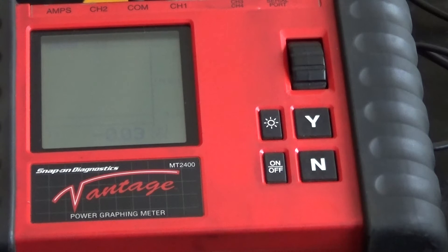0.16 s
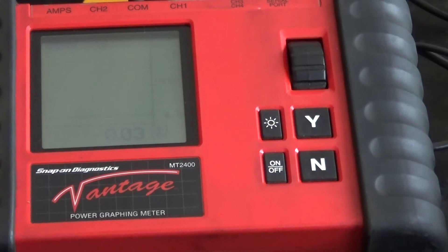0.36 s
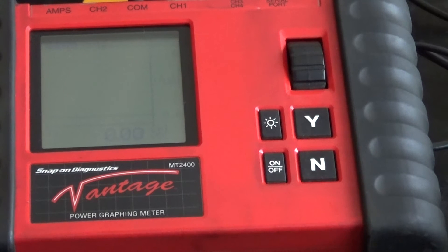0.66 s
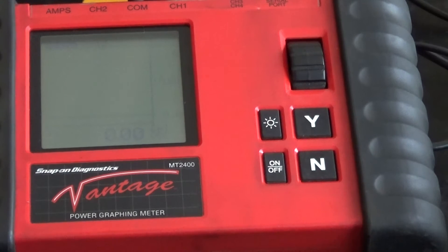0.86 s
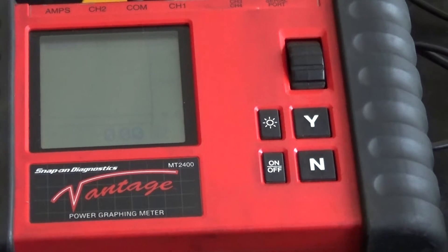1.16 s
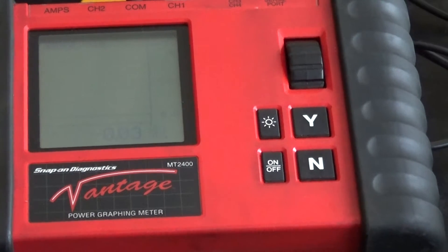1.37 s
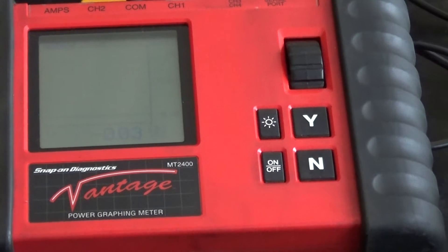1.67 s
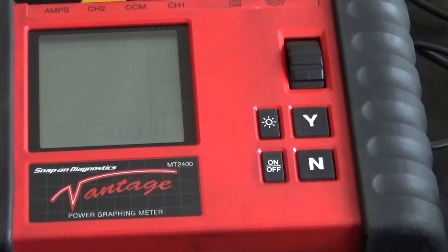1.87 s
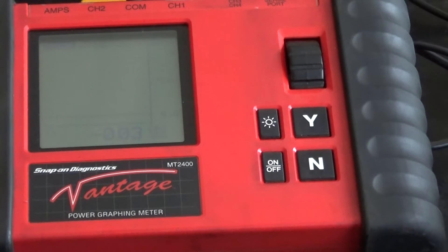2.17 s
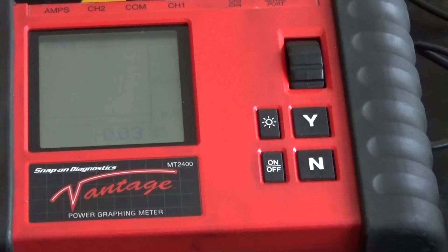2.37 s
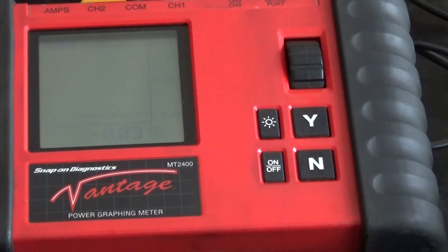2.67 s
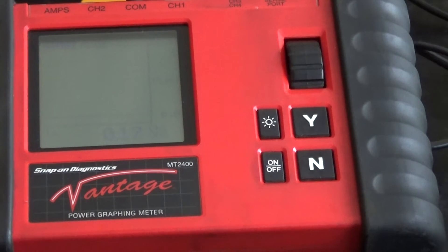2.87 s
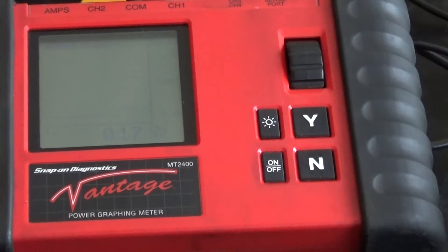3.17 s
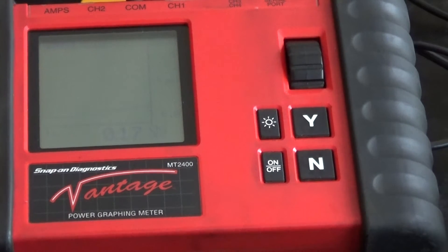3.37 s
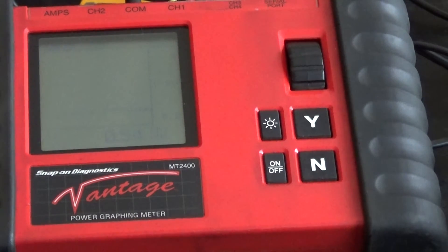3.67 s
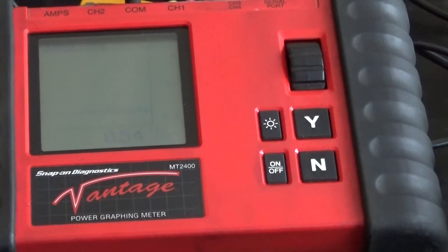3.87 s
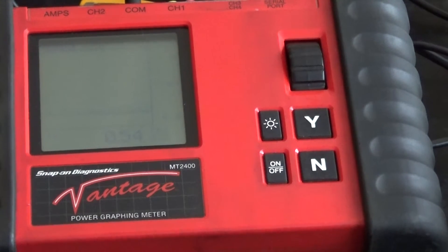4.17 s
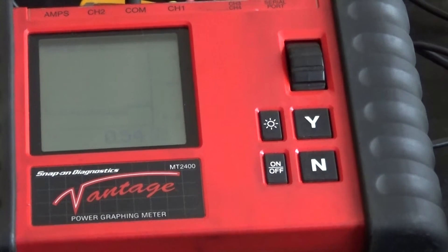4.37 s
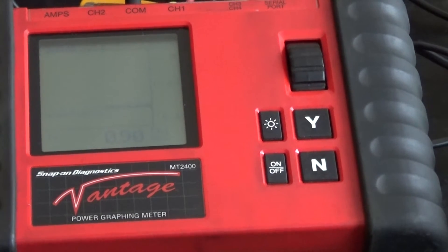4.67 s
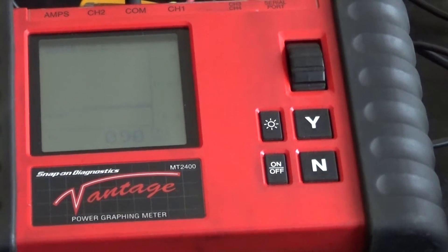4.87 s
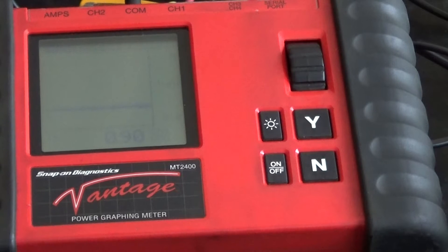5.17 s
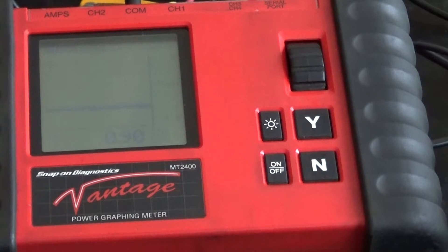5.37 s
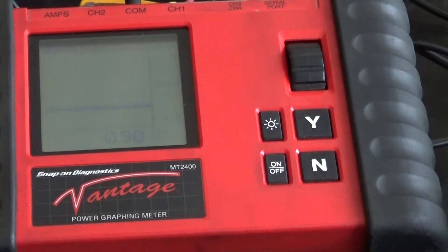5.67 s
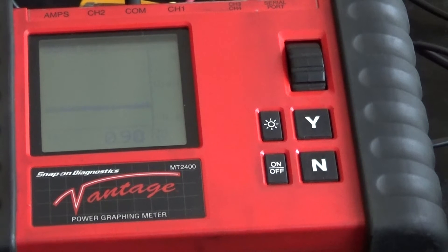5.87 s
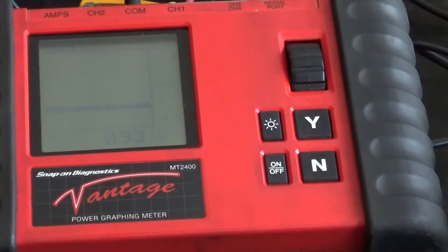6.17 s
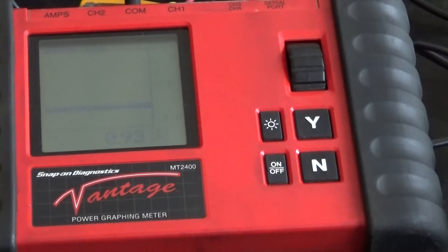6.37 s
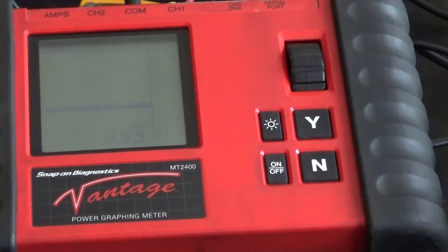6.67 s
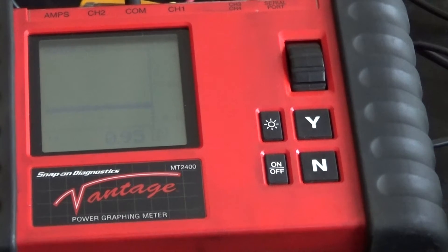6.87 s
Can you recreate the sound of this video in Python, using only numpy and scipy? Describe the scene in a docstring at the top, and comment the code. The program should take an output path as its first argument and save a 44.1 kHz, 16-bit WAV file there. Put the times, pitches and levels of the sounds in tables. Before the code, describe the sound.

In a quiet garage, small clicks and shuffling precede a short growling starter, then a petrol engine barks, revs up and idles steadily with valve clatter.

```python
"""Clicks and shuffling, a grinding starter, then a throbbing engine with ticking valves and a faint whine.
A four-cylinder petrol car is started in a garage, with two microphones close to the engine bay.
Engine pulses follow one crank cycle and excite air and metal resonances; the alternator is a gliding tone.
The starter is worn-tooth noise, strokes and howl that follow its motor; key and body noises are shaped
noise bursts and decaying tones, over a steady room murmur and hiss."""
import sys
import numpy as np
from scipy import signal
from scipy.fft import rfft, irfft
from scipy.io import wavfile

SR = 44100
rng = np.random.default_rng(int(sys.argv[2]) if len(sys.argv) > 2 else 0)


def int16_out(signal):
    """Quantize to a 16-bit WAV file."""
    q = np.round(np.clip(np.atleast_2d(signal).T, -1, 1) * 32767)
    wavfile.write(sys.argv[1], SR, q.astype(np.int16))


N = 309582
T = np.arange(N) / SR


def undb(db):
    """Decibels to gain."""
    return 10 ** (np.asarray(db) / 20)


def unit(x):
    """Scale to rms 1."""
    return x / np.sqrt(np.mean(x ** 2))


def ramp(start, end):
    """Rises from 0 to 1 between two times in seconds."""
    return np.clip((T - start) / max(end - start, 1e-3), 0, 1)


def swell(s, half_length):
    """A smooth Gaussian bump of height 1; half_length is its standard deviation in seconds."""
    return np.exp(-((T - s) / half_length) ** 2 / 2)


def noise():
    """White noise."""
    return rng.standard_normal(N)


def walk(rate):
    """A random wander through straight lines between knots, `rate` knots per second."""
    knots = rng.standard_normal(4096)
    return 1.08 * np.interp(T * rate, np.arange(len(knots)), knots)


def convolve(x, response):
    """Pass a sound through an impulse response."""
    return signal.oaconvolve(x, response)[:N]


def colour(x, points, size=8192):
    """Causal minimum-phase filter through (hz, db) points."""
    hz, db = np.transpose(points)
    bins_hz = np.arange(size // 2 + 1) * SR / size
    log_gain = np.log(undb(np.interp(np.log(bins_hz + 1), np.log(hz), db)))
    # folding the cepstrum forward in time makes the filter causal
    cepstrum = irfft(log_gain)
    cepstrum[1:size // 2] *= 2
    cepstrum[size // 2 + 1:] = 0
    return convolve(x, irfft(np.exp(rfft(cepstrum))))


def resonate(x, hz, width):
    """One resonance with gain 1 at its centre."""
    return signal.lfilter(*signal.iirpeak(hz, hz / width, fs=SR), x)


def resonate_twice(x, hz, width):
    """The same resonance passed twice, for steeper sides."""
    return resonate(resonate(x, hz, width), hz, width)


def band(hz, width):
    """Noise of rms 1 in one steep resonance."""
    return unit(resonate_twice(noise(), hz, width))


def tail(t60, size=32768):
    """Dense decaying echoes of unit energy; t60 in seconds."""
    response = rng.standard_normal(size) * undb(-60 * np.arange(size) / SR / t60)
    return response / np.linalg.norm(response)


def pulses(times, sizes):
    """Impulses at the given times in seconds."""
    samples = np.clip(np.round(np.asarray(times) * SR).astype(int), 0, N)
    return np.bincount(samples, sizes, N + 1)[:N]


def each_cycle(cycle, place, db, scatter_db, jitter_s, count=128):
    """One impulse whenever the engine passes a place in its cycle."""
    chance = rng.standard_normal((count, 2))
    times = np.interp(np.arange(count) + place, cycle, T, right=2 * T[-1])
    return pulses(times + jitter_s * chance[:, 0], undb(db + scatter_db * chance[:, 1]))


# air box resonances: centre_hz, width_hz, level_db
AIRBOX = [(326, 52, -5), (379, 47, -8), (416, 62, 3.5), (494, 30, -13), (585, 20, -15), (712, 50, -19)]


def airbox(x):
    """The intake booms in a few broad resonances that swell and die within a firing or two."""
    return sum(undb(db) * resonate_twice(x, hz, width) for hz, width, db in AIRBOX)


# intake gulps of one cycle: place (0-1 of a cycle), level_db
GULPS = [(.165, -6.5), (.299, -10), (.532, -6.5), (.666, -.5), (.792, -5.5), (.903, -8), (.948, -7.5)]
# the idle valve opens once and pulls the engine up to speed
SURGE_START_S, SURGE_ATTACK_S, SURGE_HOLD_S, SURGE_RELEASE_S = 4.33, 0.1, 0.22, 0.2
SURGE_OPEN_S = SURGE_START_S + SURGE_ATTACK_S
SURGE_CLOSES_S = SURGE_OPEN_S + SURGE_HOLD_S
SURGE_END_S = SURGE_CLOSES_S + SURGE_RELEASE_S
# after the surge the intake falls back, then fills again as the firings settle
SETTLED_S, FALLBACK_DB = 5.68, -2
# while the idle valve is open, the firings drone in the inlet pipe
DRONE_HZ, DRONE_WIDTH_HZ, DRONE_DB = 309, 27, -12.5


def intake(cycle, intake_db, surge):
    """Unequal gulps throb once a cycle; until they settle, even firings and pipe rebounds mix in."""
    gulps = sum(each_cycle(cycle, place, db, scatter_db=1, jitter_s=.00003) for place, db in GULPS)
    unsettled = (1 - ramp(SURGE_END_S, SETTLED_S)) * (1 - .65 * surge)
    even = sum(each_cycle(cycle, 0.166 + k / 4, -7, scatter_db=2.5, jitter_s=.00008) for k in range(4))
    # the inlet pipe rings back between the firings
    rebounds = sum(each_cycle(cycle, .299 + k / 4, -11, scatter_db=2.5, jitter_s=.0003) for k in range(4))
    boom = unit(airbox(gulps * (1 - .6 * unsettled) + (even + rebounds) * unsettled))
    rush = unit(colour(noise(), [(40, -49), (140, -33), (250, -13), (400, 1.5), (500, -12.5),
                                 (800, -29), (2000, -50.0)]))
    rush = undb(-12.5 + 2 * unsettled) * rush
    drone = undb(DRONE_DB) * surge * unit(resonate_twice(even, DRONE_HZ, DRONE_WIDTH_HZ))
    fallback_db = FALLBACK_DB * unsettled * ramp(SURGE_CLOSES_S, SURGE_END_S)
    return (boom + drone + rush) * undb(intake_db + fallback_db) * ramp(3.58, 3.72)


# hardest of the first ragged firings: start_s, level_db
CATCHES = [(3.482, -26), (3.589, -25), (3.623, -13), (3.655, -17), (3.74, -13.5), (3.789, -17), (3.86, -33),
           (3.983, -12), (4.085, -22), (4.284, -22), (4.379, -11.5), (4.404, -10)]
# weaker firings between them follow the crank
RAGGED_START_S, RAGGED_END_S, RAGGED_DB, RAGGED_SCATTER_DB = 3.6, 4.4, -25, 4.5


def catches(cycle):
    """The first ragged firings: each barks in the air box and thumps in the exhaust."""
    times, db = np.transpose(CATCHES)
    weak = sum(each_cycle(cycle, k / 4, RAGGED_DB, RAGGED_SCATTER_DB, jitter_s=0.00185) for k in range(4))
    weak = weak * (T > RAGGED_START_S) * (T < RAGGED_END_S)
    bark_peak = np.abs(airbox(pulses([0], [1.]))).max()
    bark = airbox(pulses(times, undb(db)) + weak) / bark_peak
    # the thumps differ far less in strength than the barks
    blows = pulses(times, undb(0.16 * db)) + undb(1.0) * weak
    thump = resonate(resonate(blows, 110, 48), 78, 46)
    thump = signal.sosfilt(signal.butter(5, (48, 116), "bandpass", fs=SR, output="sos"), thump)
    return undb(-4.5) * bark + undb(16.0) * thump


# exhaust boom: multiple (of the firing rate), level_db
BOOM = [(1, -1), (2, -2.5), (3, -14.5), (4, -1)]


def exhaust(cycle, boom_db):
    """Smooth firing harmonics; all but the second come up as the speed rises."""
    risen = .2 + .8 * ramp(4.43, 5.0)
    boom = 0
    for multiple, db in BOOM:
        tone = undb(db) * np.sin(2 * np.pi * 4 * multiple * cycle)
        boom = boom + tone * (1 if multiple == 2 else risen)
    return undb(boom_db + .8 * walk(14)) * boom * ramp(3.57, 3.65)


# valve ticks of one cycle: place (0-1 of a cycle), level_db
TICKS = [(.153, 0), (.175, -4), (.225, 1), (.285, -3), (.395, -6), (.49, -1), (.517, -2), (.545, -3),
         (.62, -6), (.92, -2), (.975, -4)]
# chain and belt noise over one cycle: place (0-1 of a cycle), level_db
CHAIN = [(.06, -.5), (.2, -1.5), (.39, 0), (.58, .5), (.72, -3.5), (.82, -3.5), (.91, -1)]
# spectrum of the valve gear: frequency_hz, level_db
VALVE_COLOUR = [(30, -56), (150, -32), (310, -19), (520, -7), (635, -4), (775, -2), (845, -8.5),
                (1020, -0.5), (1110, -4), (1310, -3.5), (3520, -5), (3830, -4.5), (5320, -6.5),
                (6050, -5.5), (7490, -10), (9540, -8.5), (11500, -22.5), (13000, -28), (15700, -45)]
# valve cover, ringing at every tick: centre_hz, width_hz, level_db
COVER = [(990, 35, -4), (1330, 50, -3), (1960, 60, -3), (2850, 70, 0), (3350, 40, -4), (3880, 170, -1),
         (5900, 150, -6)]
COVER_DB = -9.5


def valve_gear(cycle, gear_db):
    """Valves tick with a metallic ring and a dry crack, over chain and belt noise that swells with cam load."""
    blows = [each_cycle(cycle, place, db, scatter_db=3, jitter_s=.00012) for place, db in TICKS]
    ring = sum(convolve(blow, tail(t60=.025)) for blow in blows)
    crack = noise() * convolve(sum(blows), undb(-60 * T[:2048] / .022))
    ticks = unit(colour(unit(ring) + unit(crack), [(500, -21), (1500, -17.5), (3000, -4.0),
                                                   (10000, -12.5), (14000, 8.5)]))
    place, db = np.transpose(CHAIN)
    load = undb(np.interp(cycle, place, db, period=1))
    rattle = unit(load * noise() * undb(0.37 * walk(500)))
    link_knocks = unit(load * links(cycle))
    clatter = unit(colour(.88 * ticks + .68 * rattle + .8 * undb(-2) * link_knocks, VALVE_COLOUR))
    cover = unit(sum(undb(db) * resonate(ring + crack, hz, width) / np.sqrt(width)
                     for hz, width, db in COVER))
    return unit(clatter + undb(COVER_DB) * cover) * undb(gear_db) * np.sqrt(ramp(3.58, 3.78))


def links(cycle, count=72):
    """Chain links and followers knock, small and dry, at the same places in every cycle."""
    chance = rng.standard_normal((count, 2))
    knocks = [each_cycle(cycle, (k + .3 * shift) / count, 3 * size, scatter_db=1.5, jitter_s=.00002)
              for k, (shift, size) in enumerate(chance)]
    # twelve different short rings are shared among the knocks
    return sum(convolve(sum(knocks[k::12]), tail(.006, size=512)) for k in range(12))


# nearest injector opening and shutting: place (0-1 of a cycle), level_db
INJECTOR = [(.168, -2), (.466, 0), (.49, -2)]
INJECTOR_DB = -38.5


def injector(cycle):
    """The nearest injector opens and shuts with thin, bright ticks at fixed places in the cycle."""
    blows = sum(each_cycle(cycle, place, db, scatter_db=2, jitter_s=.0001) for place, db in INJECTOR)
    tick = noise() * convolve(blows, undb(-60 * T[:2048] / .026))
    tick = unit(colour(tick, [(2000, -31), (6000, -26), (9500, 17), (11500, -16), (15500, -7)]))
    return undb(INJECTOR_DB) * tick * ramp(3.4, 7.7)


LIFTER_DB, LIFTER_START_S, LIFTER_OILED_S = -1, 4.0, 5.9


def dry_lifter(cycle):
    """One dry lifter clacks once a cycle, fading as oil pressure reaches it."""
    blows = each_cycle(cycle, .635, 0, scatter_db=1, jitter_s=.0001)
    clack = noise() * convolve(blows, undb(-60 * T[:4096] / .075))
    clack = resonate_twice(clack, 4300, 1300)
    return undb(LIFTER_DB) * clack * (T > LIFTER_START_S) * (1 - ramp(LIFTER_START_S, LIFTER_OILED_S))


WHINE_PER_CYCLE = 56.4  # cycles of the whine per engine cycle
BRACKET_HZ, BRACKET_WIDTH_HZ, BRACKET_DB = 586, 34, 21


def alternator(cycle, firing_hz, whine_db):
    """The belt-driven rotor whines well above the firing rate, louder where its bracket resonates."""
    hz = WHINE_PER_CYCLE * firing_hz / 4
    bracket_db = BRACKET_DB / (1 + (2 * (hz - BRACKET_HZ) / BRACKET_WIDTH_HZ) ** 2)
    tone = np.sin(2 * np.pi * WHINE_PER_CYCLE * cycle + .7 * walk(28))
    return tone * undb(whine_db + bracket_db + 3 * walk(9)) * ramp(3.6, 3.8)


# loose metal knocks: start_s, centre_hz, width_hz, level_db
KNOCKS = [(3.548, 2920, 1790, -16.5), (3.622, 2720, 700, -20), (3.642, 6450, 500, -20),
          (3.742, 1410, 1200, -20), (4.032, 1695, 1300, -20.5)]
KNOCK_T60_S = 0.14


def knocks():
    """Loose metal knocks, each in its own register, while the engine shakes."""
    out = 0
    for s, hz, width, db in KNOCKS:
        decay_db = -60 * np.maximum(T - s, 0) / KNOCK_T60_S
        out = out + band(hz, width) * undb(db + decay_db) * ramp(s, s + 0.0023)
    return out


SUCK_S, SUCK_HALF_LENGTH_S, SUCK_DB = 4.46, 0.12, -29


def suck():
    """A hollow rush of air is sucked past the idle valve as it opens."""
    air = unit(colour(noise(), [(300, -27), (580, 3), (820, -6), (1050, 6), (1500, -15), (3000, -46)]))
    return undb(SUCK_DB) * swell(SUCK_S, SUCK_HALF_LENGTH_S) * air


# compressions that load the starter: centre_s, half_length_s, growl_db
COMPRESSIONS = [(3.065, 0.041, -21), (3.207, 0.033, -24.5), (3.321, 0.019, -25), (3.432, 0.024, -24.5),
                (3.505, 0.013, -35)]
# pinion slamming in, then spun up as the engine catches: centre_s, half_length_s, added_db
GEAR_FLARES = [(2.94, 0.017, 5), (3.832, 0.076, 2)]
# tooth rate, sagging in compressions and racing once the engine fires: time_s, tooth_rate_hz
MESH = [(2.95, 900), (3.0, 1650), (3.05, 1330), (3.085, 1060), (3.12, 1300), (3.155, 1720), (3.18, 1600),
        (3.21, 1320), (3.245, 1400), (3.285, 1930), (3.33, 1530), (3.39, 1900), (3.435, 1560), (3.5, 2000),
        (3.8, 2100)]
# ring gear and bell housing resonances: centre_hz, width_hz, level_db
HOUSING = [(1310, 60, -5), (1645, 90, -3), (2285, 70, 2.5), (2660, 110, -4), (4268, 60, 5), (5240, 60, -1),
           (6600, 150, -6), (7190, 150, -6)]
# spectra of the grind, the growl and the coasting motor: frequency_hz, level_db
STARTER_COLOUR = [(30, -58), (150, -44), (1000, -16), (1700, 1.5), (2400, 0.5), (3300, 1), (4300, 4),
                  (5800, 3), (7300, 0.5), (8200, -2), (9500, -2), (12000, -13), (15700, -25)]
GROWL_COLOUR = [(30, -48), (130, -52), (230, -23.5), (400, -12), (560, -5), (720, 3), (850, -7), (1050, 0),
                (1350, -2.5), (2000, -11.5), (2600, -29), (4400, -69)]
COAST_COLOUR = [(3000, -14), (4200, -15), (4750, -3.5), (5300, -11), (6200, -15), (9200, -18.5),
                (10200, -15.5), (11500, -23), (15000, -35)]
PINION_TEETH, STROKES_PER_TURN, STROKE_SCATTER_DB, STROKE_T60_S = 10, 4, 4, .012
# the teeth bite a little ahead of each compression
STARTER_DB, BITE_DB, BITE_LEAD_S, FREE_GROWL_DB = -18, -0.7, 0.0083, -32
# overtone regions that flare: spacing, width, spread and knots per second
FLARE_STEP_HZ, FLARE_WIDTH_HZ, FLARE_SPREAD_DB, FLARE_RATE = 200, 140, 4.5, 30
# the housing rings in fits and stops as the pinion is thrown out
RING_SPREAD_DB, RING_RATE, THROWN_OUT_S = 2, 35, 3.87
GROAN_S, GROAN_HALF_LENGTH_S, GROAN_DB = 3.02, .05, -28
SHRIEK_S, SHRIEK_HALF_LENGTH_S, SHRIEK_HZ, SHRIEK_WIDTH_HZ, SHRIEK_DB = 3.595, 0.03, 4200, 300, -21


def starter():
    """Pinion teeth grind on the ring gear; each compression drags the motor down and makes it growl."""
    bite = sum(swell(s - BITE_LEAD_S, length) for s, length, _ in COMPRESSIONS)
    gear_db = STARTER_DB + BITE_DB * bite + sum(db * swell(s, length) for s, length, db in GEAR_FLARES)
    growl_gain = undb(FREE_GROWL_DB) + sum(undb(db) * swell(s, length) for s, length, db in COMPRESSIONS)
    turns = np.cumsum(np.interp(T, *np.transpose(MESH))) / SR / PINION_TEETH
    # the same worn teeth come round on every turn, so their overtones glide with the motor
    wear = rng.standard_normal(256)
    wear_place = np.arange(len(wear)) / len(wear)
    mesh = unit(np.interp(turns + .022 * walk(70), wear_place, wear, period=1))
    stroke_times = np.flatnonzero(np.diff(np.floor(turns * STROKES_PER_TURN))) / SR
    chance = rng.standard_normal((len(stroke_times), 2))
    blows = pulses(stroke_times + .0002 * chance[:, 0], undb(STROKE_SCATTER_DB * chance[:, 1]))
    stroke_envelope = convolve(blows, undb(-60 * T[:1024] / STROKE_T60_S))
    grind = .45 * mesh + unit(noise() * stroke_envelope)
    # the tooth contact keeps shifting, so one overtone region after another flares up
    flares = sum(resonate_twice(noise(), hz, FLARE_WIDTH_HZ) * undb(FLARE_SPREAD_DB * walk(FLARE_RATE))
                 for hz in np.arange(600, 4400, FLARE_STEP_HZ))
    ring = 0
    for hz, width, db in HOUSING:
        fits = undb(db + RING_SPREAD_DB * walk(RING_RATE))
        ring = ring + fits * resonate(resonate(noise(), hz, width), hz, 2 * width)
    ring = unit(ring) * (1 - ramp(THROWN_OUT_S - .08, THROWN_OUT_S + .03))
    grind = unit(grind) + undb(-3) * unit(flares) * (.5 + .7 * np.minimum(bite, 1))
    gear = undb(-1.5) * unit(colour(grind, STARTER_COLOUR)) + undb(-9 + 4.5 * ramp(3.3, 3.5)) * ring
    growl = growl_gain * unit(colour(noise() * stroke_envelope, GROWL_COLOUR))
    # the heavy motor groans as it takes up the load
    groan = unit(colour(grind, [(100, -42), (215, -7.0), (300, 0.5), (420, -7), (700, 9.5), (1200, -43)]))
    groan = undb(GROAN_DB) * swell(GROAN_S, GROAN_HALF_LENGTH_S) * groan
    # thrown out, the motor coasts
    whirr = undb(-22.0) * unit(colour(noise(), COAST_COLOUR)) * ramp(3.3, 3.97) * (1 - ramp(3.25, 6.57))
    # the overrun pinion shrieks as the engine catches
    shriek = undb(SHRIEK_DB) * swell(SHRIEK_S, SHRIEK_HALF_LENGTH_S) * band(SHRIEK_HZ, SHRIEK_WIDTH_HZ)
    engaged = ramp(2.943, 2.955) * np.sqrt(1 - ramp(3.32, 4.065))
    return (gear * undb(gear_db) + howl(turns, bite) + growl + groan) * engaged + shriek + whirr


HOWL_DB, HOWL_OCTAVE_DB, HOWL_ROUGH_RADIANS = -21, -6, .35


def howl(turns, bite):
    """Loaded teeth howl at their meshing rate, a rough note that bends with the motor in each compression."""
    phase = 2 * np.pi * PINION_TEETH * turns + HOWL_ROUGH_RADIANS * walk(400)
    tone = np.sin(phase) + undb(HOWL_OCTAVE_DB) * np.sin(2 * phase)
    tone = tone * np.minimum(bite, 1) * (1 - ramp(3.45, 3.49)) * undb(2.5 * walk(120))
    return undb(HOWL_DB) * (tone + .7 * convolve(tone, tail(.08)))


# key, lock, relay and solenoid clicks: start_s, snap_db, knock_db, keys_db (before a 3 dB lift), t60_s
CLICKS = [(.2, -56, -55, -72, 0.11), (0.278, -43, -47, -72, 0.035), (.644, -60, -58, -44, .06),
          (0.655, -56, -50, -36, 0.065), (0.671, -57, -53, -40, .06), (.71, -62, -58, -50, .06),
          (.748, -64, -58, -46, .06), (.824, -49, -46, -54, 0.56), (1.156, -45, -37.5, -50, 0.11),
          (2.404, -55, -52, -66, .12), (2.475, -55, -51, -70, 0.13), (2.534, -38.5, -46, -59, 0.078),
          (2.561, -42, -52, -60, 0.046), (2.566, -27, -32, -44, 0.1), (2.682, -37, -37.5, -54, 0.11),
          (2.788, -31.5, -56, -40, 0.062), (2.922, -30, -46, -45, 0.76), (2.948, -21.5, -37, -28, 0.39)]
# ring of the keys: pitch_hz, t60_s, level_db
KEYS = [(2700, .1, -7.5), (3020, .1, 0), (3075, .15, 0), (3160, .12, -1), (3260, .09, -4), (3500, .1, -15),
        (3810, .09, -16), (5173, .12, -19)]
# spectra of the snap and the knock: frequency_hz, level_db
SNAP_COLOUR = [(590, -67), (1000, -3.5), (2120, -1), (2690, -2), (3090, -4), (5900, 0.5), (7520, -8.5),
               (9580, -3.5), (15700, -30)]
KNOCK_COLOUR = [(25, -70), (60, -48), (130, -37), (300, 0), (540, 4.5), (750, 0), (1400, -2), (2500, 1.5),
                (5000, -21)]


def clicks():
    """Each click is a bright snap and a dull knock, and may set the keys ringing; the garage answers."""
    snap, knock = unit(colour(noise(), SNAP_COLOUR)), unit(colour(noise(), KNOCK_COLOUR))
    out = np.zeros(N)
    age = np.arange(SR // 2) / SR
    for s, snap_db, knock_db, ring_db, t60 in CLICKS:
        span = slice(int(s * SR), int(s * SR) + SR // 2)
        ring = 0
        for hz, ring_t60, db in KEYS:
            shifted_hz = hz * (1 + .008 * rng.standard_normal())
            tone = np.sin(2 * np.pi * shifted_hz * age + rng.uniform(0, 2 * np.pi))
            ring = ring + undb(db - 60 * age / ring_t60) * tone
        click = (undb(snap_db) * snap[span] + undb(knock_db) * knock[span]) * undb(-60 * age / t60)
        out[span] += click + undb(ring_db + 3.0) * ring * (1 - np.exp(-age / 0.0014))
    return out + undb(-4.0) * convolve(out, tail(t60=0.35))


THUNK_S, THUNK_HZ, THUNK_WIDTH_HZ, THUNK_DB, THUNK_T60_S = 2.406, 545, 150, -42.5, 0.24


def thunk():
    """A short hollow knock of resonant noise as the ignition lock turns."""
    body = band(THUNK_HZ, THUNK_WIDTH_HZ)
    decay_db = -60 * np.maximum(T - THUNK_S, 0) / THUNK_T60_S
    return body * undb(THUNK_DB + decay_db) * ramp(THUNK_S - .001, THUNK_S + .002)


def bump():
    """Someone's weight lands softly against the car: a dull decaying thud."""
    thud = unit(colour(noise(), [(25, -36), (50, -21), (90, -15), (170, -2.0), (300, -2), (800, -13),
                                 (2000, -5.5), (5000, -39)]))
    return undb(-41.0 - 60 * np.maximum(T - 1.16, 0) / 0.37) * thud * ramp(1.135, 1.15)


SCRAPE_S, SCRAPE_HALF_LENGTH_S, SCRAPE_HZ, SCRAPE_WIDTH_HZ, SCRAPE_DB = 1.26, 0.039, 3170, 1300, -40


def scrape():
    """A short, gritty scrape just after the bump: a noise band of jittering level."""
    grit = undb(SCRAPE_DB + 3 * walk(300))
    return grit * swell(SCRAPE_S, SCRAPE_HALF_LENGTH_S) * band(SCRAPE_HZ, SCRAPE_WIDTH_HZ)


# spectrum of the fuel pump: frequency_hz, level_db
PUMP_COLOUR = [(80, -38), (500, -24), (2850, -25), (3050, 1), (3300, -5), (3900, -2), (4700, -12),
               (5900, -6), (7200, -18), (10500, -8), (15000, -29)]


def fuel_pump():
    """The pump gives a brief thin rasp, gone as the starter engages."""
    buzz = unit(colour(noise() * undb(2 * walk(420)), PUMP_COLOUR))
    return undb(-37.5) * buzz * ramp(2.82, 2.845) * (1 - ramp(2.88, 2.99))


# movements before the start, at full strength from hold_start_s, after the rise:
# hold_start_s, rise_s, hold_s, fade_s, rustle_db, scuff_db
MOVES = [(.11, 0.12, .03, 0.085, -44, -51.5), (0.194, .03, .02, 0.19, -58, -49.5),
         (0.607, 0.086, 0.049, 0.18, -53.5, -53), (0.727, 0.033, 0.33, 0.22, -59, -48),
         (1.24, 0.086, 0.039, 0.099, -41.5, -60), (1.39, 0.039, 0.071, 0.084, -45.5, -53.5),
         (1.672, 0.12, 0.075, 0.15, -65, -51.5)]
# spectra of the cloth and of dull scuffing: frequency_hz, level_db
RUSTLE_COLOUR = [(1060, -57), (1800, -8), (2660, -3), (3620, -1.5), (4620, -3.5), (9810, -8), (13800, -21),
                 (15700, -30)]
SCUFF_COLOUR = [(25, -56), (60, -27), (150, -14.5), (350, -10), (700, -2.5), (1050, -2.5), (1500, -9),
                (3000, -22), (5000, -41)]


def shuffling():
    """Each movement swells, holds and fades: cloth rustles in fine grains over dull scuffing."""
    rustle_power, scuff_power = 0, 0
    for hold_start, rise, hold, fade, rustle_db, scuff_db in MOVES:
        before, after = np.maximum(hold_start - T, 0), np.maximum(T - hold_start - hold, 0)
        motion = np.exp(-before / rise - after / fade)
        rustle_power = rustle_power + (undb(rustle_db) * motion) ** 2
        scuff_power = scuff_power + (undb(scuff_db) * motion) ** 2
    rustle = unit(colour(noise() * undb(0.58 * walk(400)), RUSTLE_COLOUR)) * np.sqrt(rustle_power)
    scuff = unit(colour(noise(), SCUFF_COLOUR)) * np.sqrt(scuff_power) * undb(0.75 * walk(26.3))
    return rustle + scuff


# faint high chirps: centre_s, half_length_s, level_db
CHIRPS = [(1.02, .04, -64), (1.818, .04, -66), (2.33, .04, -66)]


def chirps():
    """Thin, faint, high chirps of narrow-band noise."""
    gain = sum(undb(db) * swell(s, length) for s, length, db in CHIRPS)
    return gain * unit(resonate(resonate(noise(), 7160, 220), 7200, 220))


# spectrum of the room hiss: frequency_hz, level_db
HISS_COLOUR = [(880, -44), (1500, -3), (1720, -10), (2050, -11.5), (5440, -19), (7230, -21.5), (15700, -29)]
ROOM_MURMUR_DB, ROOM_HISS_DB = -55, -59


def room_tone():
    """The garage murmurs and hisses steadily: two coloured noises."""
    murmur = undb(ROOM_MURMUR_DB) * unit(colour(noise(), SCUFF_COLOUR))
    return murmur + undb(ROOM_HISS_DB) * unit(colour(noise(), HISS_COLOUR))


# colour of the side echoes at the two microphones: frequency_hz, level_db (side minus mid)
WIDTH = [(60, -25), (200, -18), (400, -16.5), (700, -10), (2400, -11.5), (8000, -11.5), (11000, -27),
         (15000, -93)]


def stereo(x, balance):
    """Echoes from the car body and the garage walls reach the two microphones differently."""
    side = colour(convolve(x, .5 * tail(.03) + .87 * tail(.45)), WIDTH)
    return np.array([colour(x + sign * side, [(hz, sign * db / 2) for hz, db in balance])
                     for sign in (1, -1)])


# how each part follows the engine: idle_db, speed_db (per doubling), surge_db (added)
GEAR_LAW = (-19, 5.6, 0)
INTAKE_LAW = (-21, 25.6, 6.3)
BOOM_LAW = (-38, 8.7, 8.7)
WHINE_LAW = (-31.5, 45, 1.9)
IDLE_HZ = 56  # firings per second


def follow(law, firing_hz, surge):
    """Level in dB of an engine part: louder with speed and with effort."""
    idle_db, speed_db, surge_db = law
    return idle_db + speed_db * np.log2(firing_hz / IDLE_HZ) + surge_db * surge


# crank speed, four firings to a cycle: time_s, firing_rate_hz
SPEED = [(3.6, 43.07), (3.85, 40.84), (4.1, 40.72), (4.3, 38.37), (4.6, 48.0), (4.85, 53.69), (5.2, 54.05),
         (5.5, 56.15), (5.75, 56.84), (6.0, 55.83), (6.4, 55.84), (7.0, 55.18)]
# engine balance at the two microphones: frequency_hz, level_db (left minus right)
ENGINE_BALANCE = [(60, -1.5), (200, 1.5), (420, -5), (700, 3), (1300, 2.5), (4400, 0), (15000, 5.5)]


def scene():
    """Key and starter, then the engine, whose parts share the crank speed and one surge of effort."""
    firing_hz = np.interp(T, *np.transpose(SPEED))
    cycle = np.cumsum(firing_hz) / SR / 4
    surge = ramp(SURGE_START_S, SURGE_OPEN_S) - ramp(SURGE_CLOSES_S, SURGE_END_S)
    gear_db, intake_db, boom_db, whine_db = (follow(law, firing_hz, surge)
                                             for law in (GEAR_LAW, INTAKE_LAW, BOOM_LAW, WHINE_LAW))
    gas = intake(cycle, intake_db, surge) + suck() + catches(cycle) + exhaust(cycle, boom_db)
    metal = valve_gear(cycle, gear_db) + injector(cycle) + dry_lifter(cycle) + knocks()
    metal = metal + alternator(cycle, firing_hz, whine_db)
    engine = stereo(gas + metal, ENGINE_BALANCE)
    cranking = stereo(starter(), [(200, -5.0), (1300, 2.5), (3000, 1.5), (15000, 1.0)])
    handling = clicks() + thunk() + bump() + scrape() + fuel_pump() + shuffling() + chirps()
    handling = stereo(handling, [(200, 0.19), (5000, 3.2)])
    return engine + cranking + handling + stereo(room_tone(), [(200, -1.5), (5000, -2.1)])


TOP_HZ = 15850


def record(dry):
    """The recorder rounds the highest peaks and cuts the top."""
    rounded = .9 * np.tanh(dry / .9)
    return signal.sosfilt(signal.ellip(12, .2, 80, TOP_HZ, fs=SR, output="sos"), rounded)


dry = scene()
out = record(dry)
int16_out(out)
```